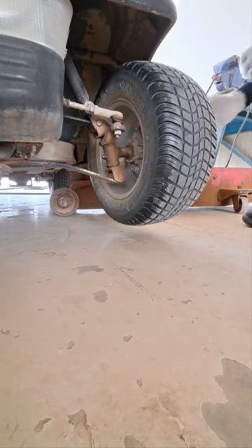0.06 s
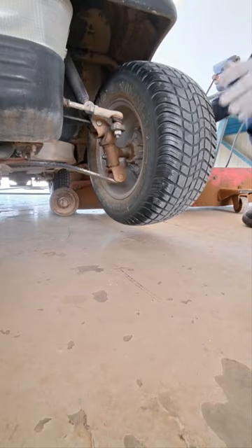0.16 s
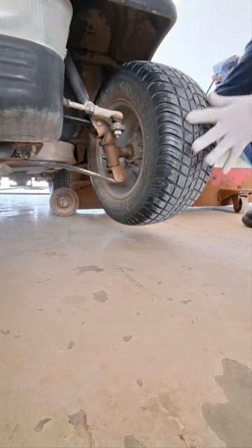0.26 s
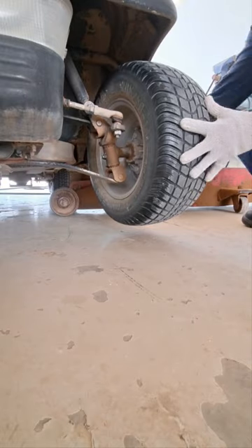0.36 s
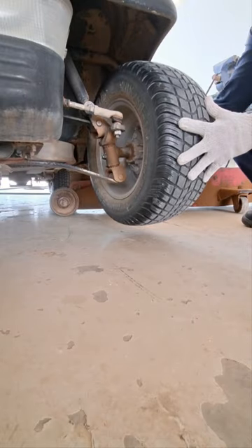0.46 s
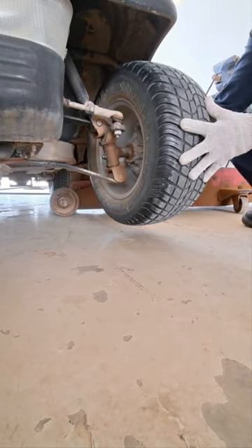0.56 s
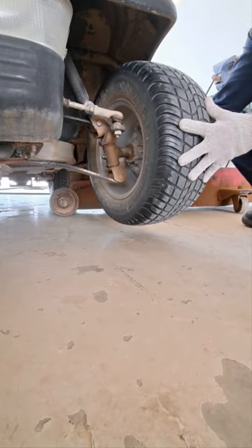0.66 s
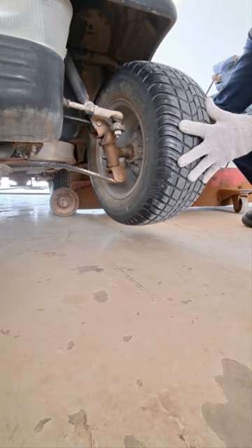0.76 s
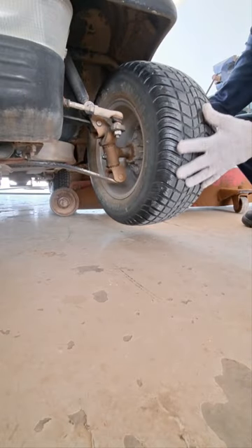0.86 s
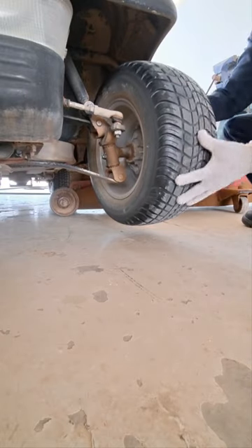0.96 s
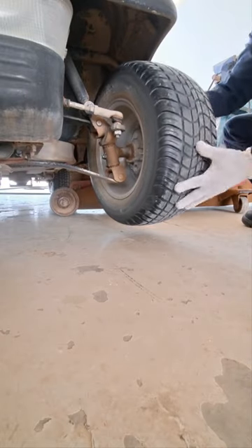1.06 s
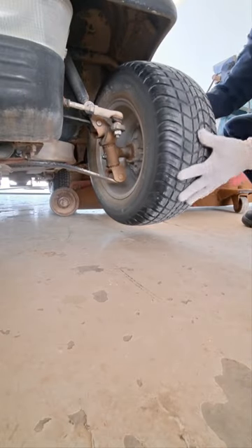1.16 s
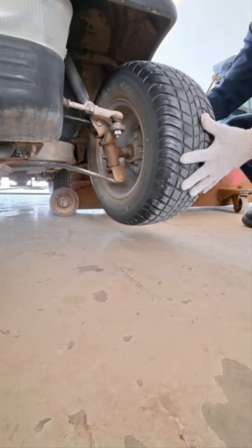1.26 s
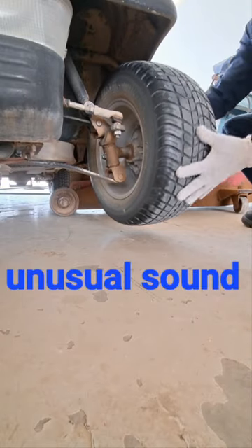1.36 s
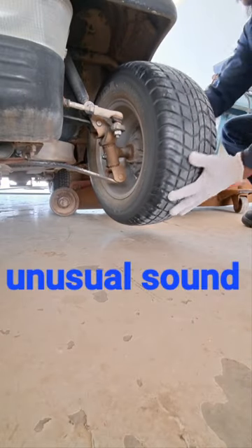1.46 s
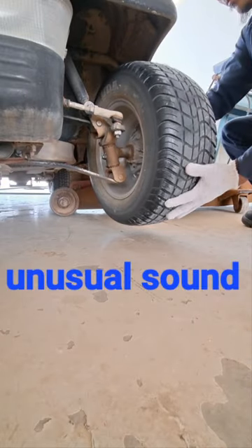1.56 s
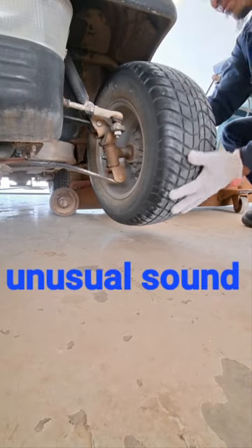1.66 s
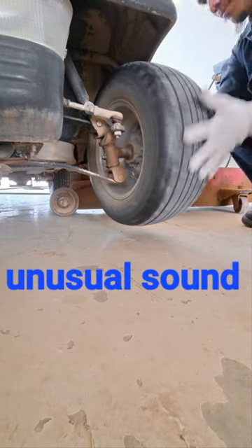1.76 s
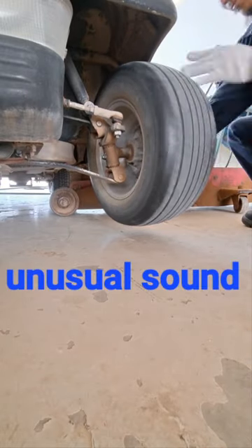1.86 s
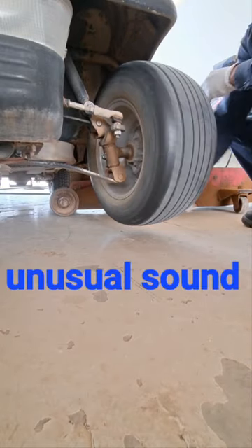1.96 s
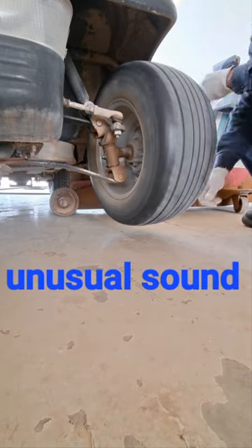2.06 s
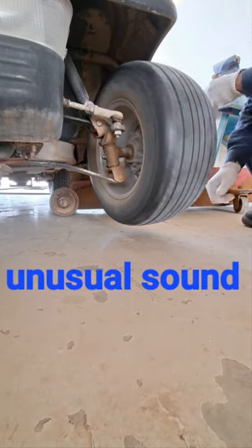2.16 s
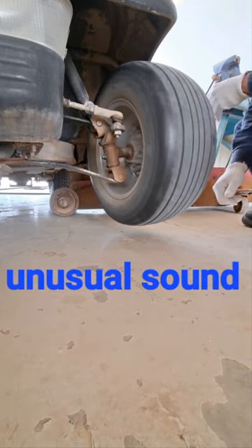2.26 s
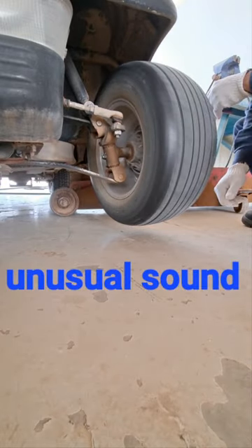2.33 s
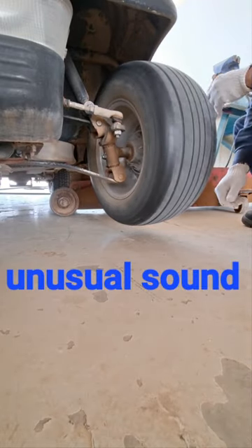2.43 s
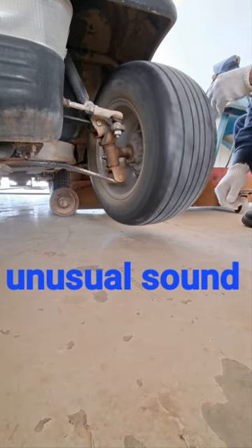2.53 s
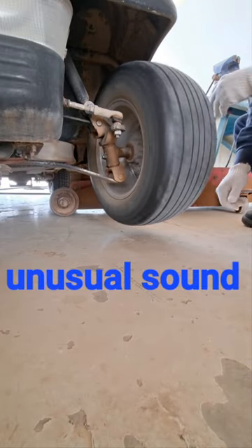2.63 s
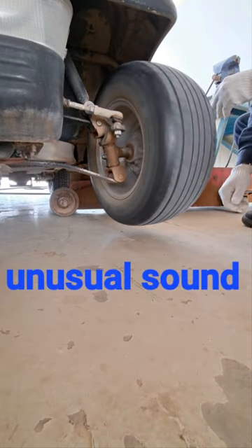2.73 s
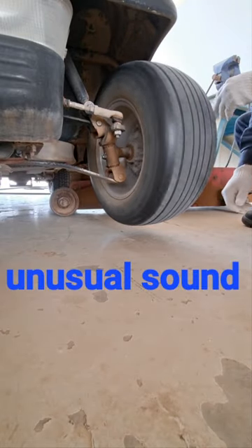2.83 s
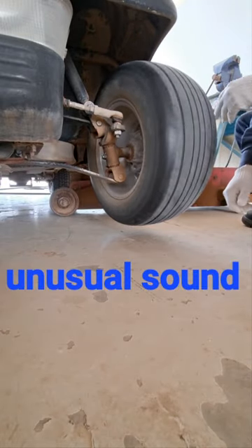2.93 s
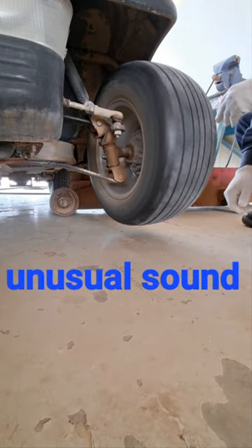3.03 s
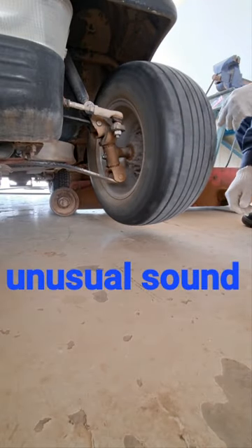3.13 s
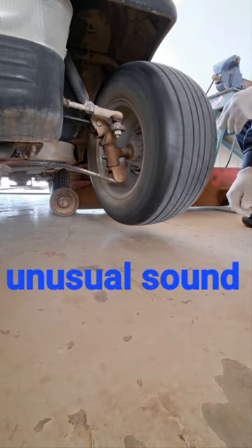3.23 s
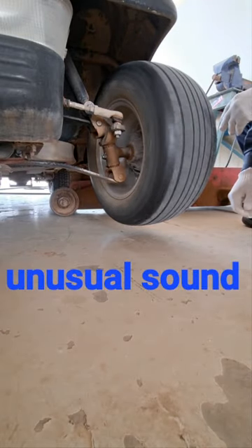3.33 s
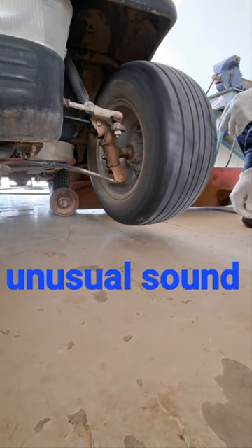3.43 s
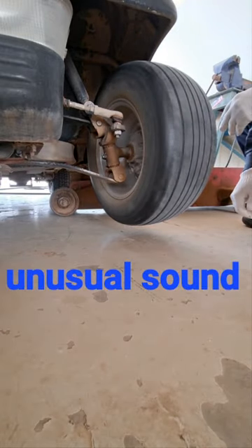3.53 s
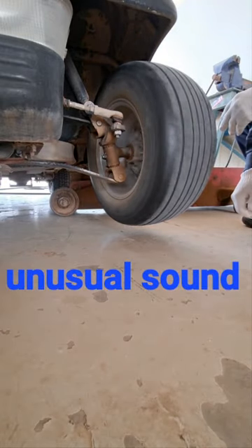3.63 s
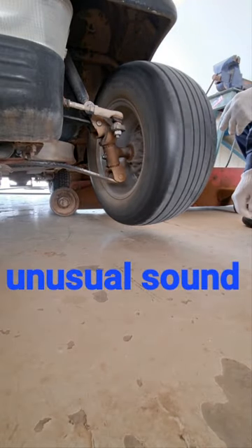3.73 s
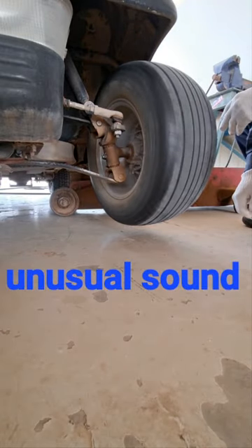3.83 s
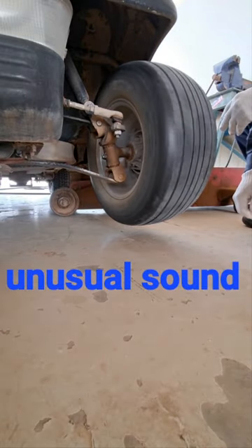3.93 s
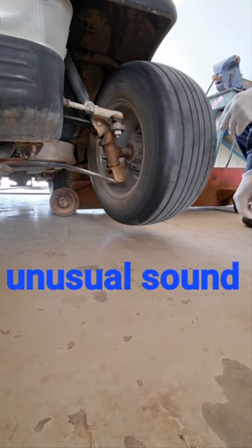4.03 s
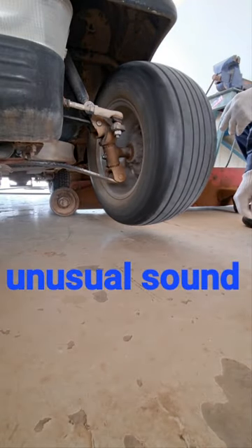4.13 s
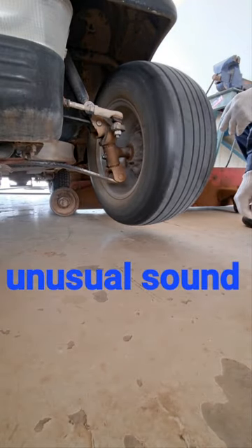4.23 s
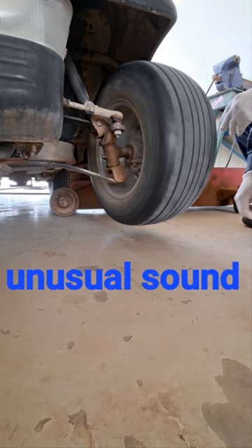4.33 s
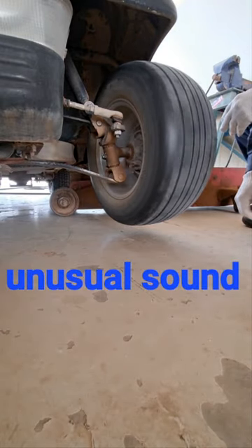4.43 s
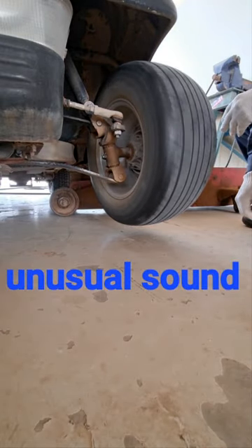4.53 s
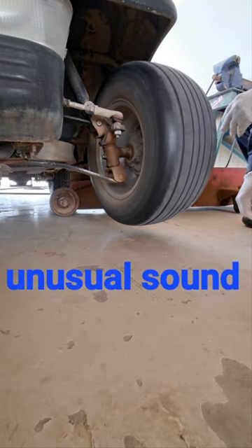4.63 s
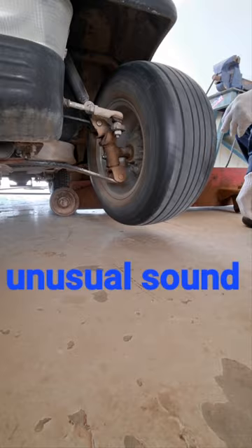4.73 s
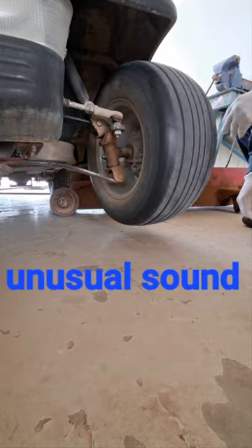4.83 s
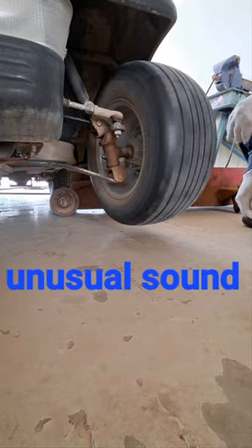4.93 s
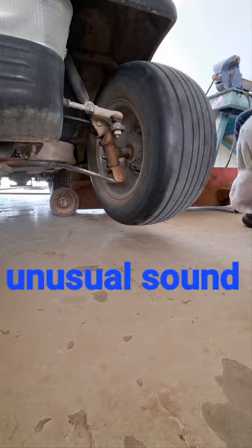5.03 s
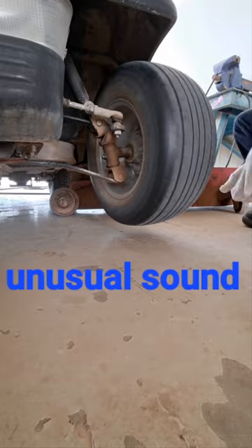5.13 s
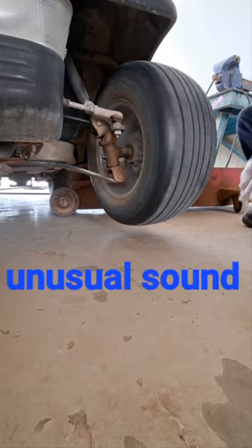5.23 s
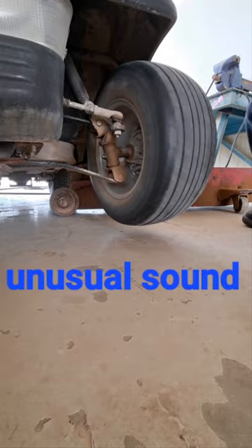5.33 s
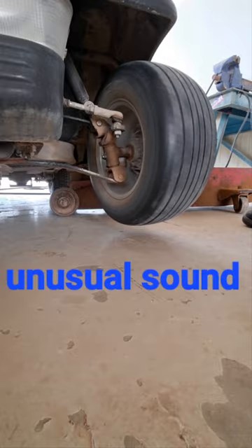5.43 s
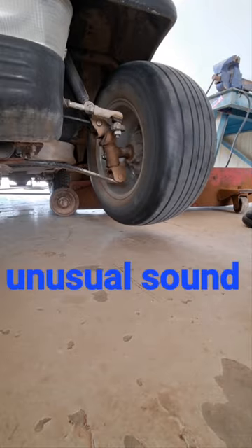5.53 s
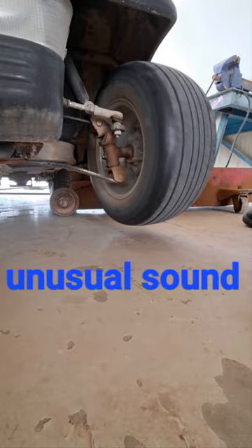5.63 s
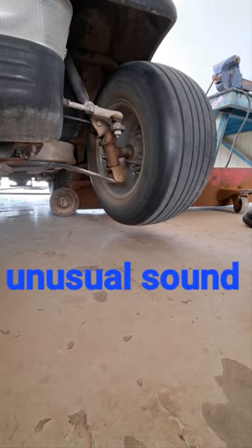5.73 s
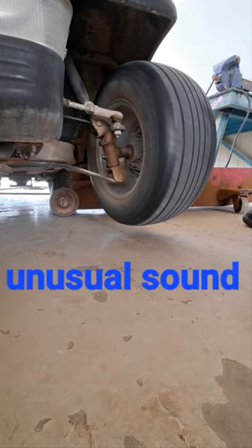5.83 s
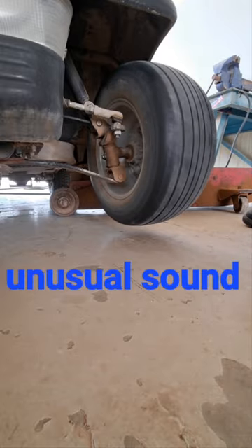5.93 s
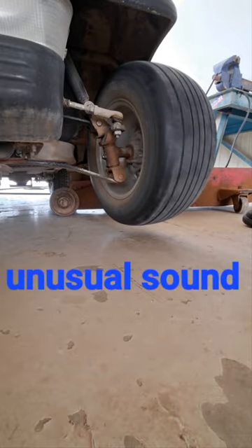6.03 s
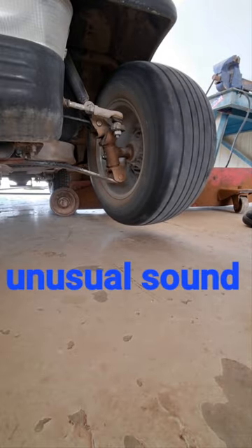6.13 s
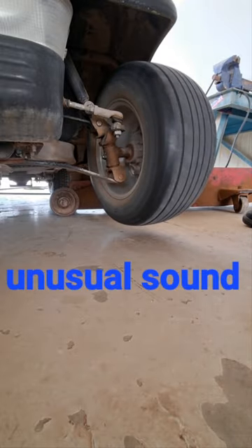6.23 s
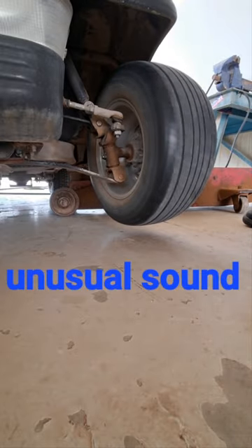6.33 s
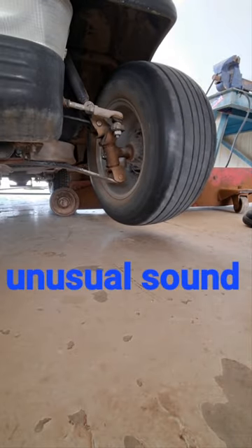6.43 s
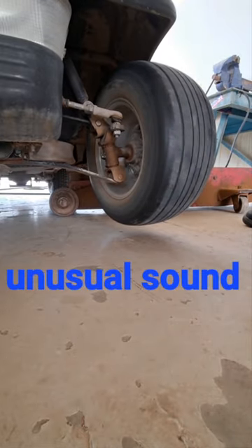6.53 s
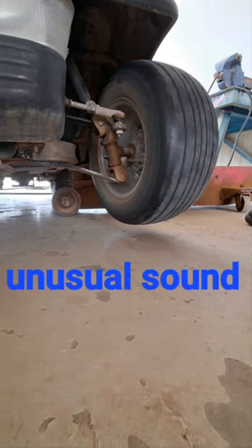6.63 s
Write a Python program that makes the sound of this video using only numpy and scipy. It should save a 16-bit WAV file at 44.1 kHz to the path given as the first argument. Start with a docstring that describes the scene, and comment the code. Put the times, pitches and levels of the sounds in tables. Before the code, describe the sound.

A low machine hum and dull hall noise sit beneath a close stereo pickup near a workshop floor. At 0 seconds a dull thud with a faint clack opens, with dry glove and cloth rustle; weaker bumps come around 0.8, and soft swishing strokes around 1.2 to 1.7. At about 2.1 the wheel is spun with a strong, hollow thump. A deep, gritty bearing rumble begins at once, crowded with irregular thuds, hub knocks, metal clacks and fine ticks, densest from 2.2 to 3.5, with a barely audible rubber squeak near 2.65. From 3.5 to 5.4 the rumble slowly weakens and metal clicks become sparser, while the hum throbs at times. At 5.55 a loud, sharp knock and metallic clack burst out, followed by a heavy thud at 5.7 and small clinks near 5.9. A quieter rough rumble with a little grinding and light rattle continues to the end at 6.7.

```python
"""First a low machine hum, a soft rustle of glove and overalls, and dull thuds with a clack.
Then a gloved hand spins a raised wheel in an open workshop, near a stereo microphone on the floor.
Rollers over a pitted race (random impacts) rumble in tyre and hub; loose parts thud, clack and tick
as decaying resonances and bursts. Rubber squeaks are sine glides; rustle, hall and hiss are shaped noise."""
import sys
import numpy as np
from scipy import signal
from scipy.fft import rfft, irfft, next_fast_len
from scipy.io import wavfile
from scipy.ndimage import uniform_filter1d, map_coordinates

SR = 44100
rng = np.random.default_rng(int(sys.argv[2]) if len(sys.argv) > 2 else 0)


def master_out(mix):
    """Clip the mix to full scale and print it as 16-bit PCM to the path in sys.argv[1]."""
    frames = np.transpose(np.atleast_2d(mix))
    ceiling = np.clip(frames, -1, 1)
    pcm = np.round(ceiling * 32767).astype(np.int16)
    wavfile.write(sys.argv[1], SR, pcm)


N = 294588  # samples


def amp(db):
    """Gain of a dB value."""
    return 10 ** (np.asarray(db) / 20)


def unit(x):
    """Scaled to rms 1."""
    return x / np.sqrt(np.mean(x ** 2) + 1e-20)


def along(points, hz):
    """Interpolate (f/Hz, value) points on a log frequency axis."""
    f, value = np.transpose(points)
    return np.interp(np.log(hz + 1), np.log(f + 1), value)


def curves(rows):
    """One value per sample for each column after the time."""
    s, *columns = np.transpose(rows)
    return [np.interp(np.arange(N) / SR, s, column) for column in columns]


def wobble(rate):
    """A smooth random curve, rate knots a second."""
    knots = rng.standard_normal(int(N * rate / SR) + 4)
    return map_coordinates(knots, [np.arange(N) * rate / SR])


def filtered(x, response):
    """x times a complex response of frequency."""
    m = next_fast_len(N + SR // 2)
    return irfft(rfft(x, m) * response(np.fft.rfftfreq(m, 1 / SR)), m)[..., :N]


def body(modes):
    """The causal response of a set of resonances, alternating in sign."""
    def response(f):
        total = 0
        for k, (centre, width, db) in enumerate(modes):
            resonance = 1j * f * width / (centre * centre - f * f + 1j * f * width)
            total = total + (-1) ** k * amp(db) * resonance
        return total
    return response


def grit(per_s, spread_db):
    """Tiny impacts at random moments, their strengths scattered by random dB amounts."""
    hit = rng.random(N) < per_s / SR
    return hit * amp(spread_db * rng.exponential(size=N)) * rng.standard_normal(N)


# the spinning wheel: t/s, rumble level/dB, grind level/dB, steel rattle level/dB
SPIN_LEVELS = [(1.9, -52, -71.5, -65.5), (2.07, -33.5, -47.5, -64), (2.19, -24, -42, -60.5),
               (2.3, -29.5, -48, -59), (2.82, -25.5, -45, -55.5), (3.0, -25, -45, -57),
               (3.44, -26, -47, -60), (4.28, -27, -45.5, -59.5), (4.93, -31, -51, -61),
               (5.44, -33, -54, -61), (5.75, -29, -54, -52.5), (5.92, -35, -46, -55),
               (6.08, -33, -44, -55.5), (6.21, -33, -49.5, -58), (6.68, -34, -52.5, -56)]
# resonances of wheel, hub and axle: f/Hz, width/Hz, relative level/dB
WHEEL_MODES = [(52, 16, -6), (77.4, 22, -5), (120.5, 31, -5), (154, 23.3, 0), (238.2, 29, -2),
               (263, 21.8, 1), (329, 29, -3), (362.2, 34.4, -4), (440, 25.4, -6), (491.7, 53, -13.5),
               (540.7, 49, -18), (672.3, 56, -15.5), (782.7, 133, -21), (962.4, 88, -20.5)]
# resonances of the steel drum and backplate: f/Hz, width/Hz, relative level/dB
STEEL_MODES = [(1290, 220, -13.5), (1470, 170, -3.5), (1610, 150, -1.5), (1932, 180, -1.5),
               (2001, 86, -0.5), (2226, 100, -0.5), (2415, 130, -1), (2656, 89, -2), (2881, 98, 0),
               (3000, 490, -8.5), (3940, 440, -15), (4600, 1700, -20.5)]


def bearing():
    """Rollers strike the pits of the race; the whole wheel sounds, the steel rattles faintly."""
    rumble_db, grind_db, rattle_db = curves(SPIN_LEVELS)
    rollers = amp(.9 * wobble(9) + 1.6 * wobble(28)) * grit(1800, spread_db=1.8)
    loose_steel = amp(2.4 * wobble(14)) * grit(3000, spread_db=-0.5)
    tyre = body([mode for mode in WHEEL_MODES if mode[0] < 550])
    hub = body([mode for mode in WHEEL_MODES if mode[0] >= 550])
    steel = body(STEEL_MODES)

    def greased(hz):  # grease softens each contact
        return 1 / (1 + 1j * hz / 1500) ** 2

    # scaling hz moves the softening: lower for the tyre, higher for the steel
    rumble = unit(filtered(rollers, lambda hz: tyre(hz) * greased(2.3 * hz)))
    grind = unit(filtered(rollers, lambda hz: hub(hz) * greased(hz)))
    rattle = unit(filtered(loose_steel, lambda hz: steel(hz) * greased(hz / 3)))
    spinning = np.arange(N) >= SPIN_LEVELS[0][0] * SR
    return spinning * (amp(rumble_db) * rumble + amp(grind_db) * grind + amp(rattle_db) * rattle)


def chance(count, against_db, spread_db, low_hz, high_hz):
    """Blows at random moments of the spin, sized by the rumble: (t/s, level/dB, f/Hz)."""
    when, size, pitch = rng.random((count, 3)).T
    first, last = SPIN_LEVELS[2][0], SPIN_LEVELS[-1][0]
    s = first + (np.arange(count) + when) / count * (last - first)
    rumble_db = np.interp(s, *np.transpose(SPIN_LEVELS)[:2])
    db = rumble_db + against_db + spread_db * (size - .5)
    return list(zip(s, db, low_hz * (high_hz / low_hz) ** pitch))


def blows(rows, modes, t60s, octaves, rise, rough, crack_db):
    """Each blow rings mostly the modes near its centre, at new strengths; chatter roughens it."""
    out, t = np.zeros(N + SR), np.arange(SR // 8) / SR
    hz, _, mode_db = np.transpose(modes)
    for (s, db, centre_hz, *_), t60 in zip(rows, np.broadcast_to(t60s, len(rows))):
        near = np.exp(-.5 * (np.log2(hz / centre_hz) / octaves) ** 2)
        near = near + 0.16  # the other modes answer faintly
        gain = near * amp(0.56 * mode_db + rng.normal(0, 1.8, len(hz)))
        phase = rng.uniform(0, 1.06, (len(hz), 1))
        ring = gain @ np.sin(2 * np.pi * hz[:, None] * t + phase)
        chatter = 1 + rough * unit(uniform_filter1d(rng.standard_normal(len(t)), size=60))
        ring = ring * chatter * amp(-60 * t / t60) * (1 - np.exp(-t / rise)) ** 2
        # the first contact: a brief burst of smoothed noise
        contact = unit(np.convolve(rng.standard_normal(len(t)), np.hanning(18), "same"))
        crack = contact * amp(crack_db - 60 * t / 0.0087)
        out[round(s * SR):][:len(t)] += amp(db) * (ring / np.abs(ring).max() + crack)
    return out[:N]


# dull blows into the tyre and axle: t/s, ring peak level/dB, centre f/Hz
THUD_BLOWS = [(0.036, -17, 256), (0.047, -22, 248), (0.771, -26.5, 314), (0.817, -27, 330),
              (0.836, -26, 250), (0.935, -31, 360), (2.059, -25, 155), (2.169, -8.5, 273),
              (2.22, -18.5, 262), (2.299, -17.5, 240), (2.384, -21, 118), (2.442, -14.5, 264),
              (2.521, -14.5, 145), (2.638, -19.5, 278), (2.747, -16.5, 343), (2.858, -19, 152),
              (2.926, -17.5, 247), (3.08, -21, 264), (3.215, -15, 167), (3.282, -18, 263), (3.34, -18, 159),
              (3.629, -16, 258), (3.928, -21, 261), (3.989, -20.5, 160), (4.081, -16.5, 157),
              (4.272, -19, 283), (4.37, -22, 243), (4.496, -16.5, 176), (4.619, -21.5, 353),
              (4.726, -16, 257), (4.863, -21.5, 155), (5.136, -18.5, 246), (5.244, -22.5, 258),
              (5.386, -18, 280), (5.549, -12, 348), (5.636, -20, 229), (5.677, -9.5, 177),
              (5.702, -23, 151), (5.729, -19, 153), (5.797, -22, 243), (5.84, -20.5, 264),
              (6.622, -22, 142)]
# blows of loose play in the hub: t/s, ring peak level/dB, centre f/Hz
HUB_KNOCKS = [(0.032, -30, 700), (0.774, -35, 570), (0.811, -30, 630), (2.113, -28, 684),
              (2.168, -19.5, 560), (2.281, -29, 654), (2.429, -20, 707), (2.507, -29, 964),
              (2.579, -33, 712), (2.742, -25.5, 686), (2.764, -20.5, 624), (3.084, -29.5, 660),
              (3.237, -31, 657), (3.322, -29, 643), (3.427, -18.5, 710), (3.485, -31, 658),
              (3.738, -32, 668), (3.921, -31, 648), (4.07, -25.5, 740), (4.301, -29, 760),
              (4.492, -25.5, 675), (4.614, -24, 613), (4.963, -27.5, 654), (5.012, -30, 652),
              (5.131, -24.5, 720), (5.351, -31.5, 681), (5.38, -24.5, 644), (5.506, -33, 640),
              (5.543, -7, 700), (5.554, -14.5, 645), (5.633, -32, 640), (5.672, -27.5, 668),
              (5.898, -34, 700)]
# metal clacks: t/s, ring peak level/dB, centre f/Hz, t60/s
METAL_CLACKS = [(0.0318, -39.5, 1880, .03), (0.0714, -35.5, 3270, .09), (0.2818, -46.5, 1770, .07),
                (0.777, -49.5, 2100, .07), (0.815, -47.5, 2010, .07), (2.1485, -37, 1940, .04),
                (2.167, -36, 2060, .07), (2.4308, -28, 2570, .06), (2.4404, -27.5, 2600, .053),
                (2.5082, -38.5, 2540, .06), (2.739, -28.5, 2200, .06), (2.763, -22.5, 2130, .07),
                (2.9741, -44.5, 2190, .07), (3.1697, -35, 2460, .05), (3.2086, -43, 2580, .07),
                (3.3368, -40, 2150, .09), (3.4281, -27.5, 2620, .06), (3.48, -43.5, 2440, .07),
                (3.5119, -45.5, 2480, .07), (3.6222, -47, 2500, .09), (3.7438, -47, 2410, .12),
                (3.9434, -42.5, 2150, .13), (4.9606, -37, 2630, .12), (5.132, -45, 1930, .08),
                (5.3832, -45.5, 1940, .1), (5.5039, -44.5, 2800, .07), (5.546, -9, 2620, .03),
                (5.5545, -16.5, 2840, .056), (5.6364, -35, 2830, .11), (5.665, -32, 2430, .08),
                (5.6988, -37, 2970, .08), (5.89, -26.5, 2580, .12), (5.91, -34, 2620, .22),
                (5.96, -40.5, 2510, .12)]
THUD_T60, KNOCK_T60 = .098, .058  # s


def loose_parts():
    """Thuds and knocks ring the wheel's modes, clacks the steel's; more thuds and knocks come at random."""
    thuds = THUD_BLOWS + chance(count=18, against_db=5, spread_db=6, low_hz=120, high_hz=290)
    knocks = HUB_KNOCKS + chance(count=8, against_db=-9, spread_db=8, low_hz=640, high_hz=760)
    clack_t60s = [row[-1] for row in METAL_CLACKS]
    return (blows(thuds, WHEEL_MODES, THUD_T60, octaves=0.32, rise=0.0027, rough=0.012, crack_db=-46)
            + blows(knocks, WHEEL_MODES, KNOCK_T60, octaves=0.38, rise=0.0008, rough=0.12, crack_db=-22.5)
            + blows(METAL_CLACKS, STEEL_MODES, clack_t60s, octaves=0.11, rise=0.00058, rough=0.16,
                    crack_db=-9))


# sharp ticks of grit: t/s, starting level/dB, centre f/Hz
GRIT_TICKS = [(0.0328, -43, 10300), (0.2816, -49.5, 5550), (2.2557, -52.5, 11260), (2.4307, -53, 5200),
              (2.436, -48, 5200), (2.4592, -55.5, 9020), (2.6493, -54.5, 5240), (2.7395, -38, 10330),
              (2.8749, -36.5, 10900), (2.9217, -52.5, 12400), (3.2794, -58.5, 8240), (3.326, -53.5, 9000),
              (3.398, -58.5, 10900), (3.425, -56, 9690), (3.473, -47, 10870), (3.6222, -60.5, 6370),
              (3.8297, -61, 8600), (4.043, -58.5, 9690), (4.5346, -61, 10400), (4.554, -59, 10700),
              (4.6084, -58.5, 9000), (4.9606, -55, 5480), (5.0704, -53, 10850), (5.256, -48, 11130),
              (5.3812, -51, 5220), (5.5024, -55, 8680), (5.5448, -28.5, 7020)]
TICK_T60 = .035  # s


def ticks():
    """A tick is a short broad burst of noise around its centre."""
    out, t = np.zeros(N + SR), np.arange(4096) / SR
    hz = np.fft.rfftfreq(4096, 1 / SR) + 1
    random_ticks = chance(count=20, against_db=-36, spread_db=7, low_hz=5200, high_hz=10500)
    for s, db, centre_hz in GRIT_TICKS + random_ticks:
        band = np.exp(-.5 * (np.log2(hz / centre_hz) / .5) ** 2)
        shape = band / (1 + (hz / 12500) ** 6)
        burst = unit(irfft(rfft(rng.standard_normal(4096)) * shape))
        out[round(s * SR):][:4096] += amp(db - 60 * t / TICK_T60) * burst
    return out[:N]


# thin squeaks of rubber: start t/s, end t/s, from f/Hz, to f/Hz, peak level/dB
RUBBER_SQUEAKS = [(2.63, 2.73, 4600, 5300, -58), (2.62, 2.72, 4300, 4700, -62),
                  (2.65, 2.73, 3300, 3600, -60), (2.66, 2.73, 9300, 10200, -71),
                  (2.57, 2.61, 11500, 12800, -68), (6.17, 6.22, 12000, 12300, -72)]


def squeaks():
    """Rubber squeaks as short unsteady sine glides with soft ends."""
    out, t = np.zeros(N), np.arange(N) / SR
    for start, end, from_hz, to_hz, db in RUBBER_SQUEAKS:
        u = np.clip((t - start) / (end - start), 0, 1)
        hz = (from_hz + (to_hz - from_hz) * u) * (1 + .022 * wobble(400))
        out += amp(db) * np.sin(np.pi * u) * np.sin(2 * np.pi * np.cumsum(hz) / SR)
    return out


def apart(source, shared):
    """Stereo sound that the two ports hear partly apart, louder on the left."""
    common, left, right = source(), source(), source()
    return unit(np.array([left, right]) + shared * common) * amp([[2.6], [-2.6]])


# spectrum of rubbed cloth: f/Hz, relative level/dB per Hz
CLOTH_SPECTRUM = [(1060, -28), (1800, -8), (2410, -5.5), (2620, -8.5), (8060, -5.5), (12500, 2),
                  (15100, -1.5), (16000, 0.5)]
# strokes of glove and cloth: start t/s, peak t/s, time to fall 20 dB/s, level/dB, rasp against it/dB
CLOTH_STROKES = [(-0.02, 0.0, 0.55, -54, -8), (0.024, 0.034, 0.1, -48, -2), (0.03, 0.088, 0.04, -51, 2.5),
                 (0.262, 0.28, 0.07, -58.5, -1.5), (0.4, 0.5, 0.1, -69, -2),
                 (0.53, 0.542, 0.17, -55.5, -11), (0.64, 0.684, 0.08, -57, -8),
                 (0.75, 0.834, 0.12, -57.5, -7), (1.035, 1.06, 0.25, -53, -24),
                 (1.04, 1.208, 0.1, -48.5, -10), (1.29, 1.366, 0.065, -52, -14),
                 (1.4, 1.52, 0.1, -52.5, -6), (1.5, 1.56, 0.035, -51, -9), (1.59, 1.628, 0.25, -58.5, -15),
                 (1.64, 1.726, 0.08, -62, -8), (1.9, 2.112, 0.16, -47.5, -8), (2.11, 2.166, 0.018, -54, -4),
                 (2.24, 2.26, 0.09, -61, -3), (2.34, 2.36, 0.05, -68, -5), (5.25, 5.26, 0.025, -59, -9),
                 (5.372, 5.38, 0.025, -59, -20), (5.54, 5.546, 0.035, -35.5, -5),
                 (5.56, 5.644, 0.015, -44, -5), (5.57, 5.654, 0.18, -48, 1), (5.75, 5.868, 0.15, -56, -9),
                 (5.84, 5.945, 0.05, -59, -9)]
STROKE_RISE = 1.5  # power of the swell from start to peak


def rustle():
    """Fibres catch and slip in dense grains; strokes swell and let go, with a duller rasp below."""
    fibres = apart(lambda: grit(12000, spread_db=1.34), shared=0.27)

    def bright(hz):  # the share above about 6.2 kHz
        return 1 / (1 + (6200 / (hz + 1)) ** 6)

    fine = unit(filtered(fibres, lambda hz: amp(along(CLOTH_SPECTRUM, hz)) * bright(hz)))
    rasp = unit(filtered(fibres, lambda hz: amp(along(CLOTH_SPECTRUM, hz)) * (1 - bright(hz))))
    t = np.arange(0, N / SR, .001)
    start, peak, fall, db, rasp_db = np.transpose(CLOTH_STROKES)[:, :, None]
    swell = np.clip((t - start) / np.maximum(peak - start, .002), 0, 1) ** STROKE_RISE
    strokes = swell * amp(db - 20 * np.clip((t - peak) / fall, 0, None))
    light = strokes.sum(axis=0)
    firm = (amp(rasp_db) * strokes).sum(axis=0)
    light, firm = curves(np.transpose([t, light, firm]))
    return light * fine + firm * rasp


# how fast the walls let sound die: f/Hz, t60/s
WALL_DECAY = [(150, 0.37), (1500, 0.34), (10000, 0.23)]


def echo(x):
    """The walls answer with noise whose band powers follow the sound and die at their own speeds."""
    hz, t, z = signal.stft(np.pad(x, (500, 0))[:N], SR, nperseg=256)
    keep = amp(-120 * (t[1] - t[0]) / along(WALL_DECAY, hz))  # power kept per frame
    power = np.array([signal.lfilter([1 - k], [1, -k], p) for k, p in zip(keep, np.abs(z) ** 2)])
    noise = signal.stft(rng.standard_normal(N), SR, nperseg=256)[2]
    noise_rms = np.sqrt(np.mean(np.abs(noise) ** 2))
    return signal.istft(np.sqrt(power) * noise / noise_rms, SR, nperseg=256)[1][:N]


# level of the far machine's lowest line: t/s, level/dB
DRONE_LEVEL = [(0.0, -63), (0.05, -33), (2.22, -33), (2.29, -26), (2.4, -30), (3.1, -32), (3.3, -37),
               (4.1, -30), (4.3, -38), (4.67, -31), (5.0, -31), (5.26, -37), (5.47, -29), (5.68, -37),
               (5.84, -28), (5.95, -34), (6.2, -29), (6.68, -33)]
# lines of the hum: f/Hz, level/dB (the first against the drone level, the others against a fixed one)
HUM_LINES = [(70, 0.5), (118.4, -9.5), (209.9, -10.5), (479, -22)]
# dull noise of the hall: f/Hz, relative level/dB per Hz
HALL_SPECTRUM = [(15, -48), (25, -56.5), (49, -4), (81, -3.5), (165, -11.5), (220, -8.5), (299, -15),
                 (488, -18), (777, -30.5), (907, -27), (1970, -40), (2810, -52.5), (5000, -61.5),
                 (6500, -89), (11000, -120)]
# a tyre tone makes the hum throb: first swell t/s, last swell t/s, level against the drone/dB
TYRE_THROBS = [(3.46, 4.11, -2), (4.67, 4.99, -5), (6.07, 6.34, -6)]
THROB_HZ, THROB_FADE_S = 6.2, .12  # tone's height above the lowest line; fade at each end


def workshop():
    """Wavering lines of a far machine, beating with a tyre tone, over the hall's dull noise."""
    t = np.arange(N) / SR
    level_db, = curves(DRONE_LEVEL)
    phases = [2 * np.pi * hz * t + .6 * wobble(5) for hz, db in HUM_LINES]
    lines = [amp(db + 1.5 * wobble(6)) * np.sin(phase) for phase, (hz, db) in zip(phases, HUM_LINES)]
    throb = np.zeros(N)
    for first, last, db in TYRE_THROBS:
        fade = np.clip(1 + np.minimum(t - first, last - t) / THROB_FADE_S, 0, 1)
        throb += amp(db) * fade * np.sin(phases[0] + 2 * np.pi * THROB_HZ * (t - first))
    hum = amp(level_db) * (lines[0] + throb) + amp(-32) * sum(lines[1:])
    hall = unit(filtered(rng.standard_normal(N), lambda hz: amp(along(HALL_SPECTRUM, hz))))
    drift_db = .8 * wobble(3)
    return hum + amp(-38.5 + drift_db) * hall


# faint air hiss under everything: t/s, level/dB
AIR_LEVEL = [(0.0, -59), (0.32, -76), (1.1, -74), (1.25, -63), (1.58, -65), (1.8, -77), (2.83, -66),
             (3.05, -72), (4.2, -75), (5.0, -76), (5.3, -68), (5.77, -65), (5.97, -70), (6.68, -67)]
# colour of the hiss: f/Hz, relative level/dB per Hz
HISS_SPECTRUM = [(2060, -25.5), (3500, -6), (5750, -8), (8860, -5), (12100, -5.5), (15100, -7), (16000, -8)]


def air():
    """A faint noise hiss that comes and goes in patches of time and frequency."""
    z = signal.stft(apart(lambda: rng.standard_normal(N), shared=0.36), nperseg=512)[2]
    field = uniform_filter1d(rng.standard_normal(z.shape[1:]), size=45, axis=0)
    field = uniform_filter1d(field, size=4, axis=1)
    pair = signal.istft(z * amp(3.5 * unit(field)), nperseg=512)[1][:, :N]
    hiss = unit(filtered(pair, lambda hz: amp(along(HISS_SPECTRUM, hz))))
    return amp(curves(AIR_LEVEL)[0]) * hiss


def scattered(x):
    """The same sound by paths that keep changing: new phases every few milliseconds."""
    z = signal.stft(x, nperseg=128)[2]
    turned = z * np.exp(2j * np.pi * rng.random(z.shape))
    return 1.06 * signal.istft(turned, nperseg=128)[1][:N]


# likeness of the two microphone ports: f/Hz, left-right correlation
PORT_LIKENESS = [(60, 1), (300, 0.97), (520, 0.84), (1000, 0.48), (2200, 0.55), (4500, 0.22), (15000, 0.7)]
# balance of the ports: f/Hz, left minus right level/dB
PORT_TILT = [(60, 1.5), (300, 1.35), (650, -3), (1200, -1), (2400, 4.5), (6000, 2.5), (15000, 12)]
# phase between the ports: f/Hz, left leads by/rad
PORT_LEAD = [(60, 0.24), (300, 0.21), (520, 0.27), (1120, 0.99), (2070, 1.73), (3000, 2.01), (16000, 2.1)]


def ports(x):
    """Two close microphone ports: alike in the bass, shifted and less alike above."""
    def turn(hz):
        return np.arccos(np.clip(along(PORT_LIKENESS, hz), -1, 1)) / 2

    direct, loose = filtered(x, lambda hz: np.array([np.cos(turn(hz)), np.sin(turn(hz))]))
    loose = scattered(loose)
    side = np.array([[.5], [-.5]])  # half of each difference goes to each port
    return filtered(np.array([direct + loose, direct - loose]),
                    lambda hz: amp(side * along(PORT_TILT, hz)) * np.exp(1j * side * along(PORT_LEAD, hz)))


def scene():
    """Wheel and hall reach the ports, walls answer the blows; rustle and hiss are already stereo."""
    hits = loose_parts() + ticks() + squeaks()
    walls = amp(-13.5) * echo(hits)
    return ports(bearing() + hits + walls + workshop()) + rustle() + air()


TOP_HZ = 15830  # upper band limit


def record(dry):
    """The microphone's chain cuts the deepest bass and keeps nothing above its band limit."""
    return filtered(dry, lambda hz: (hz < TOP_HZ) / (1 + (36 / (hz + 1)) ** 3))


dry = scene()
out = record(dry)
master_out(out)
```